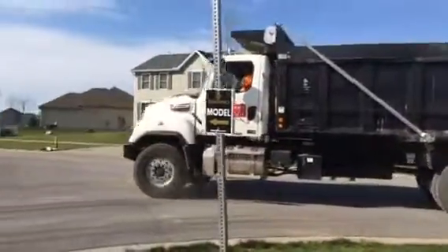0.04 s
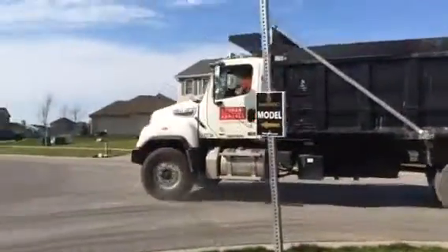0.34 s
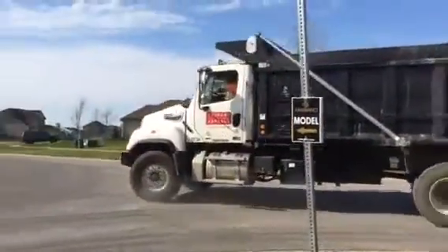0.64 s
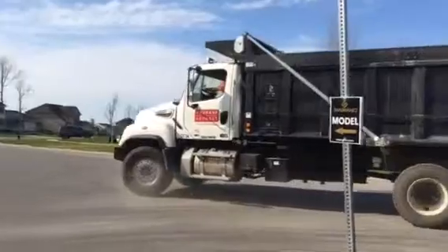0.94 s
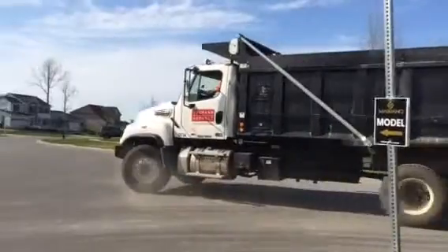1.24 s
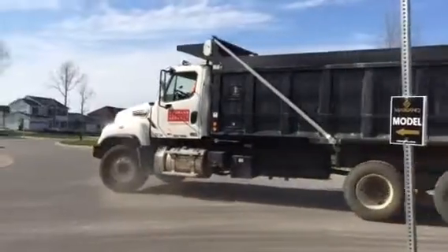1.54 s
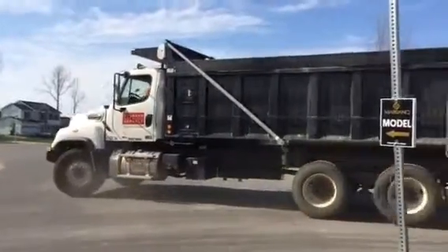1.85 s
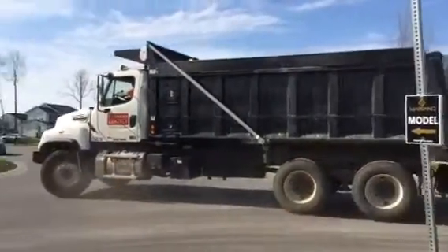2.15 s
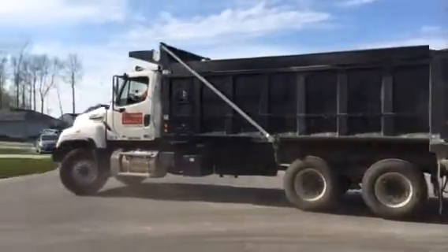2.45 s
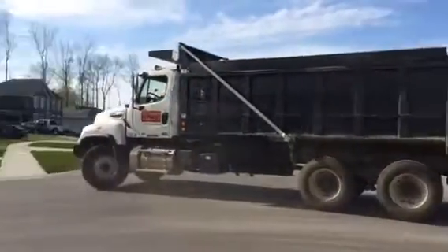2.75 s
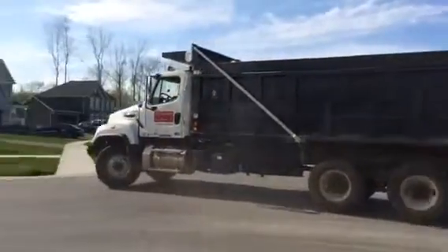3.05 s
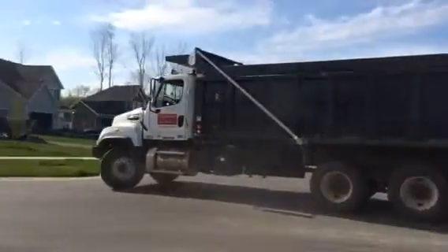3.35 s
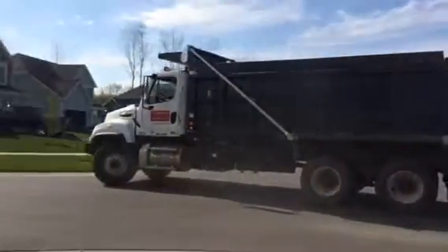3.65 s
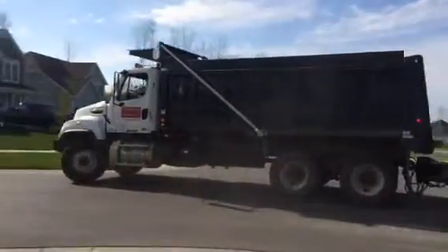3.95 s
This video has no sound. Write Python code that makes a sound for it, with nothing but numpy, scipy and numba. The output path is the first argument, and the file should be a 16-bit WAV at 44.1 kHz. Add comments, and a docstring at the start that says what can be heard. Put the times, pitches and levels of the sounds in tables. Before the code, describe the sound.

A heavy diesel truck throbs and clatters past, with a few knocks on the microphone.

```python
"""Roadside, on a hand-held phone a few metres from a passing six-cylinder diesel dump truck.
It revs up, drops to low revs after a second, then pulls again. Uneven firings throb in the exhaust
and clatter in the block, over fan and tyre rush and a low rumble; reflections slide as it moves.
Air brushes the microphone; the phone takes a few dull knocks and clicks, and its limiter ducks
after the loudest."""
import sys
import numpy as np
from scipy import signal
from scipy.fft import rfft, irfft
from scipy.io import wavfile
from scipy.ndimage import uniform_filter1d, minimum_filter1d, map_coordinates
from numba import njit

SR = 44100
rng = np.random.default_rng(int(sys.argv[2]) if len(sys.argv) > 2 else 0)


def generate_wav(signal):
    """Clip the signal to [-1, 1] and save it as 16-bit WAV at the path in sys.argv[1]."""
    frames = np.transpose(np.atleast_2d(signal))
    scaled = np.clip(frames, -1, 1) * 32767
    pcm = np.round(scaled).astype(np.int16)
    wavfile.write(sys.argv[1], SR, pcm)


N = 176400

# engine speed (time [s], firing rate [Hz])
FIRING_RATE = [(0, 80.6), (.15, 84), (.35, 90), (.55, 92.5), (.7, 93), (.85, 94), (1, 84.2), (1.15, 80.5),
               (1.3, 68.6), (1.5, 68), (1.75, 61.5), (2, 62.4), (2.3, 62.7), (2.7, 61), (3, 66),
               (3.3, 66.5), (3.6, 68.5), (4, 71.6)]
# the truck at the microphone (time [s], exhaust pulses [dB], block clatter [dB], rush [dB])
TRUCK_LEVELS = [(0, -33, -36.5, -32), (.45, -30, -33, -31), (.8, -27, -33.5, -32.5), (1.1, -31, -39, -34.5),
                (1.4, -32.5, -41.5, -35.5), (1.9, -26.5, -39.5, -35.5), (2.3, -28.5, -41, -34),
                (2.8, -31.5, -39, -34.5), (3.2, -29, -41.5, -32.5), (3.6, -28.5, -37.5, -34.5),
                (4, -31, -37, -34.5)]


def undb(db):
    return 10 ** (np.asarray(db) / 20)


def unit(x):
    """Scale to rms 1."""
    return x / np.sqrt(np.mean(x ** 2))


def curve(table):
    """Each column of a time table, sample by sample."""
    rows = np.array(table, float).T
    return [np.interp(np.arange(N) / SR, rows[0], col) for col in rows[1:]]


def colour(x, spectrum):
    """Causal filter with the given spectrum; output rms 1."""
    hz, db = np.array(spectrum, float).T
    freqs = np.maximum(np.fft.rfftfreq(2 * N, 1 / SR), 1)
    cepstrum = irfft(np.log(undb(np.interp(np.log(freqs), np.log(hz), db))))
    cepstrum[1:N] *= 2
    cepstrum[N + 1:] = 0
    return unit(irfft(rfft(x, 2 * N) * np.exp(rfft(cepstrum)))[:N])


def noise():
    return rng.standard_normal(N)


def drift(rate_hz):
    """Smooth random drift, rms 1."""
    width = max(int(SR / rate_hz), 1)
    return unit(uniform_filter1d(uniform_filter1d(noise(), width), width))


def delayed(x, lag_s):
    """Delay by a lag that may move."""
    return map_coordinates(x, [np.arange(N) - lag_s * SR], order=3, mode="mirror")


def strike(at, modes, rise_s, pitch=1):
    """The ring of a struck object; a softer contact builds up more slowly."""
    age = np.maximum(np.arange(N) / SR - at, 0)
    ring = sum(undb(db - np.minimum(60 * age / t60, 200)) * np.sin(2 * np.pi * hz * pitch * age)
               for hz, db, t60 in modes)
    return ring * (1 - np.exp(-(age / rise_s) ** 2))


def sliding_reflections(x):
    """Add bounces off road and body, whose paths change as the truck moves; output rms 1."""
    # (lag [s], change of lag [s/s], level [dB])
    paths = [(.0022, .0007, -14.5), (.0085, -.0009, -14)]
    t = np.arange(N) / SR
    return unit(x + sum(undb(db) * delayed(x, lag + slide * t) for lag, slide, db in paths))


def scattered(x, echo_db=-0.5, t60_s=0.17):
    """Add dense short echoes off the dump body and the road."""
    age = np.arange(SR // 2) / SR
    tail = rng.standard_normal(len(age)) * np.exp(-np.log(1000) * age / t60_s)
    return x + undb(echo_db) * signal.fftconvolve(x, tail / np.linalg.norm(tail))[:N]


def wind(level_db=-50.5, gust_db=6):
    """Air brushes the microphone in gusts."""
    # (frequency [Hz], density [dB])
    spectrum = [(20, -27.5), (45, 15), (70, 16), (150, -40.5), (500, -100)]
    return colour(noise(), spectrum) * undb(level_db + gust_db * drift(14.6))


def rumble(level_db=-31.5, waver_db=0.98):
    """Road and truck body rumble low."""
    # (frequency [Hz], density [dB])
    spectrum = [(18, -35), (32, -22), (48, 0), (70, 16.5), (105, 23), (135, 22.5), (200, 21), (260, 4.5),
                (330, -5), (600, -47)]
    return colour(noise(), spectrum) * undb(level_db + waver_db * drift(28))


def buffets():
    """Brief low swells of the rumble, unsteady in pitch."""
    # (time [s], half-width [s], frequency [Hz], level [dB])
    swells = [(0.856, 0.0039, 301, -21.5), (1.267, 0.021, 150, -17.5), (1.845, 0.013, 199.5, -21.5),
              (2.649, 0.025, 51.13, -31), (2.776, 0.028, 48.26, -33), (2.942, 0.016, 173.9, -24.5),
              (3.958, 0.0099, 110, -20)]
    t = np.arange(N) / SR
    sound = np.zeros(N)
    for at, width, hz, db in swells:
        envelope = undb(db) * np.exp(-((t - at) / width) ** 2)
        cycles = np.cumsum(hz * (1 + 0.13 * drift(72.2))) / SR
        sound += np.sqrt(2) * envelope * np.sin(2 * np.pi * cycles)
    return sound


def rush(waver_db=0.7):
    """Fan and tyres make a broad rush."""
    # (frequency [Hz], density [dB])
    spectrum = [(200, 0.5), (380, 1), (600, -4), (1000, -2.5), (1600, -13.5), (2500, -14.5), (2950, -30),
                (3400, -22), (5000, -30), (6500, -40.5), (7800, -52.5), (8700, -53.5), (10500, -68),
                (15000, -65)]
    level_db = curve(TRUCK_LEVELS)[2]
    return sliding_reflections(colour(noise(), spectrum)) * undb(level_db + waver_db * drift(9.2))


def finger_rub(level_db=-64.5, flicker_db=1.5):
    """A finger slides faintly over the phone."""
    # (frequency [Hz], density [dB])
    spectrum = [(1500, -10), (4000, 3.5), (7000, -3), (10000, -16), (15000, -18.5)]
    touch = curve([(0.25, 0), (0.35, 1), (0.79, 1), (0.89, 0)])[0]  # (time [s], gain)
    return colour(noise(), spectrum) * undb(level_db + flicker_db * drift(200)) * touch


def case_clicks():
    """Sharp finger contacts snap on the phone and ring its case."""
    # (time [s], ring [dB], snap [dB])
    clicks = [(0.4297, -32, -33), (.4395, -32, -35.5), (0.4612, -26, -37), (0.4891, -8, -17.5),
              (0.526, -39, -43)]
    # (frequency [Hz], level [dB], t60 [s])
    case_modes = [(900, -13, 0.005), (1210, -7.5, 0.013), (1490, 5.5, 0.0039), (1900, -3, 0.006),
                  (2980, -9.5, 0.013)]
    # (frequency [Hz], density [dB])
    snap_spectrum = [(1000, -8.5), (3500, 14), (6000, -11.5), (8500, -4), (13000, -27)]
    snap = colour(signal.unit_impulse(N), snap_spectrum)
    snap /= np.abs(snap).max()
    return sum(undb(ring_db) * strike(at, case_modes, rise_s=0.0001)
               + undb(snap_db) * np.roll(snap, int(at * SR)) for at, ring_db, snap_db in clicks)


def finger_knocks(rise_s=0.0019):
    """Fingers knock dully on the phone; a bright edge comes as the contact firms up."""
    # (time [s], thud [dB], pitch [ratio], edge [dB])
    knocks = [(0.4056, 5.5, 1, -17), (0.845, 2, 0.99, -17.5), (1.8949, 1, 1.03, -16)]
    # both (frequency [Hz], level [dB], t60 [s])
    thud_modes = [(388, -27, 0.009), (622, 1, 0.016), (676, -10, 0.005), (1350, -16, 0.0044)]
    edge_modes = [(3180, 3, 0.0045), (4800, -11, 0.003), (7650, -22, .0025)]
    return sum(undb(thud_db) * strike(at, thud_modes, rise_s, pitch)
               + undb(edge_db) * strike(at + rise_s, edge_modes, rise_s=0.0004, pitch=pitch)
               for at, thud_db, pitch, edge_db in knocks)


def injector_rattle(bursts):
    """The injectors rattle high up, louder at each firing."""
    # (time [s], level [dB])
    levels = [(0, -57.5), (.6, -55.5), (1.2, -60), (2.2, -51), (2.8, -46), (3.2, -42), (3.6, -50),
              (4, -51.5)]
    # (frequency [Hz], density [dB])
    spectrum = [(1000, -25.5), (1600, -11), (1950, 7), (2250, -3.5), (2500, 0.5), (2750, -2.5), (2950, -17),
                (3400, -17.5), (6000, -35.5), (12000, -64)]
    rattle = colour((bursts + 0.72) * noise(), spectrum)
    return sliding_reflections(rattle) * undb(curve(levels)[0])


def block_clatter(bursts, ring_db=-3, waver_s=0.002015):
    """Combustion clatters in the block and sets it ringing; the bonnet muffles the ring."""
    # both (frequency [Hz], gain [dB])
    spectrum = [(150, -3.5), (350, -2.5), (500, 0.5), (600, -8), (800, -7), (970, 2.5), (1130, -4),
                (1340, 0.5), (1590, -11), (1900, -8), (2270, -20), (2480, -13.5), (2720, -10.5),
                (2960, -57), (3250, -14.5), (3900, -30), (4600, -23), (6200, -60), (8000, -59),
                (11000, -73), (15000, -89)]
    bonnet = [(3200, -4.5), (6000, -28), (12000, -65)]
    # (frequency [Hz], level [dB], t60 [s])
    block_modes = [(511, 1.5, 0.12), (959, -1, 0.19), (978.6, -1, 0.14), (1040, -2.5, 0.25),
                   (1258, -1.5, 0.067), (1360, 5.5, 0.029), (1838, -8, 0.15), (1930, -23, 0.088),
                   (2435, -3.5, 0.1), (2492, -6, 0.13), (3080, -12.5, 0.082)]
    combustion = (bursts + 0.33) * noise()
    clatter = sliding_reflections(colour(combustion, spectrum))
    ring = signal.fftconvolve(bursts * noise(), strike(0, block_modes, rise_s=1 / SR))[:N]
    ring = delayed(ring, waver_s * drift(2.996))
    return (clatter + undb(ring_db) * colour(ring, bonnet)) * undb(curve(TRUCK_LEVELS)[1])


def exhaust_drone(firings, low_revs_hz=63.3, waver_db=2):
    """The exhaust drones at multiples of the firing rate, steadier in phase as the revs rise."""
    # tones at these multiples (time [s], 5/3x [dB], 2x [dB], 3x [dB], 6x [dB])
    levels = [(0, -31.5, -26.5, -25, -54), (.35, -33.5, -34, -26.5, -59), (.45, -55, -39, -40.5, -48),
              (.56, -33, -46.5, -28.5, -47), (.8, -34, -39, -30, -40.5), (1.1, -28, -31, -26.5, -48.5),
              (1.35, -35.5, -32.5, -32.5, -56), (1.9, -34.5, -36, -31.5, -58),
              (2.3, -47, -29.5, -34.5, -61), (2.55, -36, -38.5, -37.5, -42), (2.78, -39, -27, -39.5, -38.5),
              (3.02, -33.5, -36, -37.5, -47), (3.3, -38, -25.5, -42.5, -45), (3.6, -39.5, -33, -29.5, -52),
              (4, -34.5, -30, -29.5, -54)]
    wander = 0.092 * (low_revs_hz / curve(FIRING_RATE)[0]) ** 3
    drone = np.zeros(N)
    for multiple, db in zip((5 / 3, 2, 3, 6), curve(levels)):
        cycles = multiple * firings + rng.random() + wander * np.sqrt(multiple / 2) * drift(30)
        drone += np.sqrt(2) * np.sin(2 * np.pi * cycles) * undb(db + waver_db * drift(14))
    return drone


def exhaust_pulses(times, sizes):
    """Each firing sends a pressure pulse out of the exhaust."""
    # (frequency [Hz], gain [dB])
    spectrum = [(20, -44.5), (40, -19.5), (75, -17), (105, -9.5), (130, -1), (170, -1), (215, 0.5),
                (280, -8), (340, -15.5), (500, -24.5), (800, -35.5), (2000, -52), (12000, -120)]
    pulses = np.bincount(np.clip(times * SR, 0, N - 1).astype(int), sizes, N)
    return colour(scattered(pulses - pulses.mean()), spectrum) * undb(curve(TRUCK_LEVELS)[0])


def throb(rate_hz=22, depth_db=2.2):
    """Gain of the exhaust, which comes in uneven lumps."""
    band = signal.butter(2, [rate_hz / 1.5, rate_hz * 1.5], "band", fs=SR, output="sos")
    return unit(undb(depth_db * unit(signal.sosfilt(band, noise()))))


def engine(jitter_s=0.00069, pulse_spread_db=2.5, clatter_spread_db=2.2):
    """Six unequal cylinders fire in turn, driving exhaust, block and injectors."""
    # per cylinder: exhaust pulse [dB], its lag [firing periods], clatter [dB]
    pulse_db = (1.5, 1, -0.5, 2.5, 0.5, -0.5)
    pulse_lag = (-0.015, 0.13, -0.064, 0.13, -0.1, 0.068)
    clatter_db = (-5, -12, -6, -4.5, -8, -9)
    t = np.arange(N) / SR
    firings = np.cumsum(curve(FIRING_RATE)[0] * (1 + 0.002967 * drift(12))) / SR  # running count
    current = firings.astype(int)
    number = np.arange(current[-1] + 1)
    cylinder = number % 6
    time_draw, pulse_draw, clatter_draw = rng.standard_normal((N // 100, 3))[number].T
    times = np.interp(number + np.array(pulse_lag)[cylinder], firings, t) + jitter_s * time_draw
    pulse_sizes = undb(np.array(pulse_db)[cylinder] + pulse_spread_db * pulse_draw)
    burst_sizes = undb(np.array(clatter_db)[cylinder] + clatter_spread_db * clatter_draw)
    bursts = np.exp(-(firings % 1)) * burst_sizes[current]  # each falls to 1/e by the next firing
    pulses = exhaust_pulses(times, pulse_sizes)
    clatter = block_clatter(bursts)
    drone = exhaust_drone(firings)
    return clatter + injector_rattle(bursts) + (pulses + drone) * throb()


def scene():
    """The truck, with wind and handling noise right at the microphone, in mono."""
    roadside = engine() + rush() + wind() + rumble() + buffets()
    handling = finger_knocks() + case_clicks() + finger_rub()
    return (roadside + handling)[None]


@njit
def peak_hold(x, fall):
    """Jump to each peak and sink back."""
    peaks, held = np.empty(len(x)), 0.
    for i in range(len(x)):
        held = max(x[i], held * fall)
        peaks[i] = held
    return peaks


def record(dry):
    """The phone's limiter ducks after the loudest peaks; the top treble is cut."""
    limit_db, release_s, lookahead_s, top_hz = -2, 0.13, 0.0016, 15300
    peak = peak_hold(np.abs(dry[0]), np.exp(-1 / (release_s * SR)))
    gain = 1 / np.maximum(peak / undb(limit_db), 1)
    ahead = int(lookahead_s * SR)
    gain = uniform_filter1d(minimum_filter1d(gain, 2 * ahead), ahead)
    return signal.sosfilt(signal.ellip(8, .2, 70, top_hz, fs=SR, output="sos"), dry * gain)


dry = scene()
out = record(dry)
generate_wav(out)
```